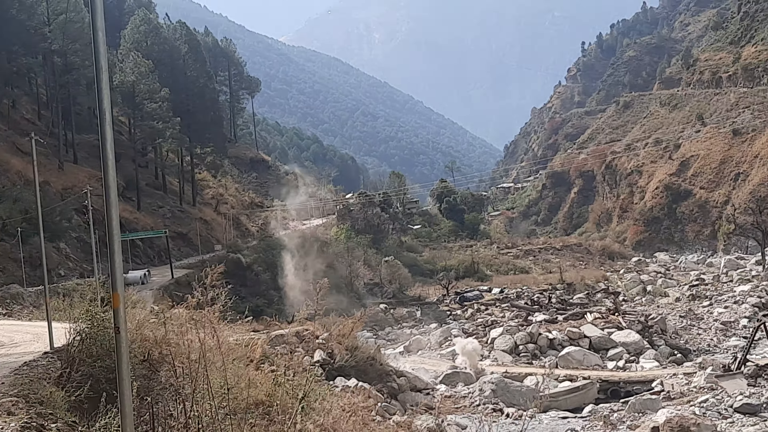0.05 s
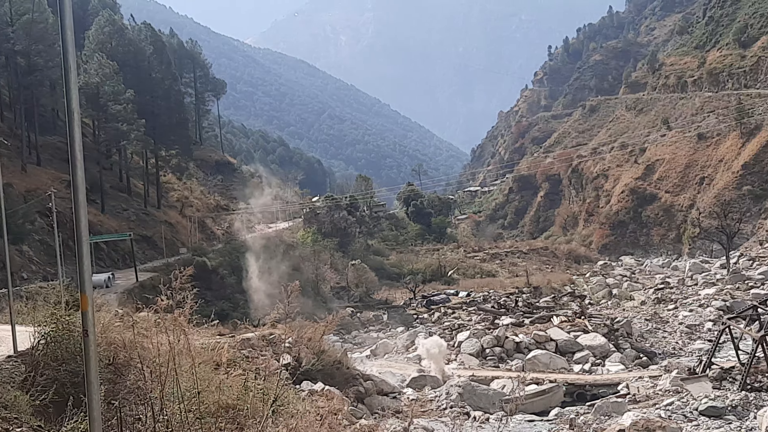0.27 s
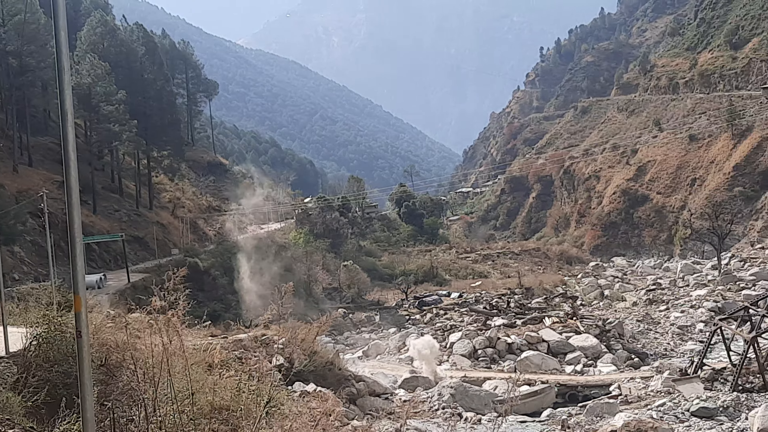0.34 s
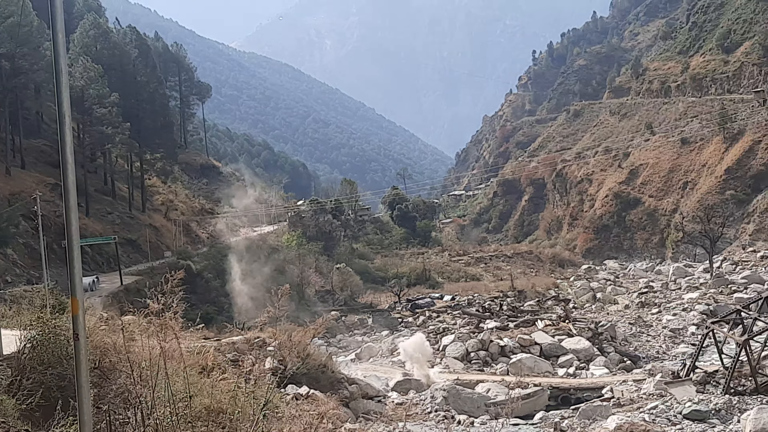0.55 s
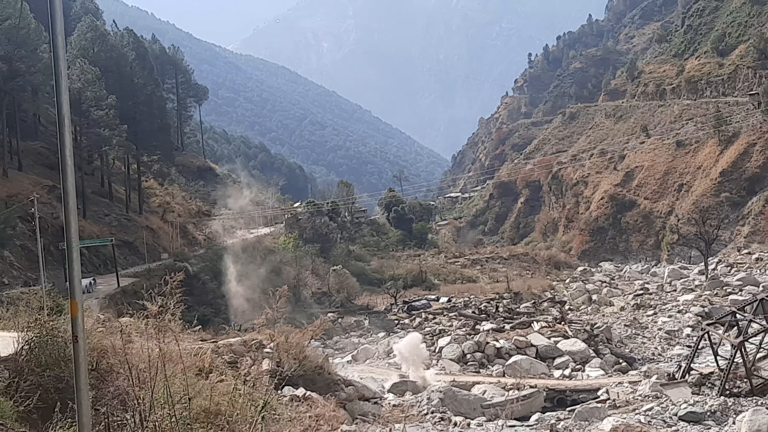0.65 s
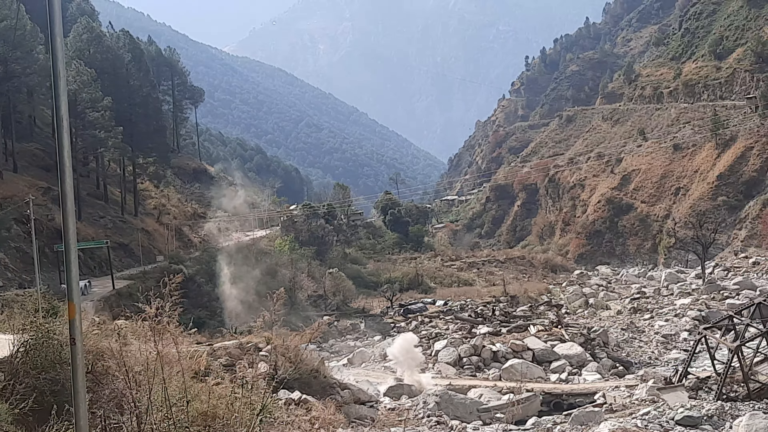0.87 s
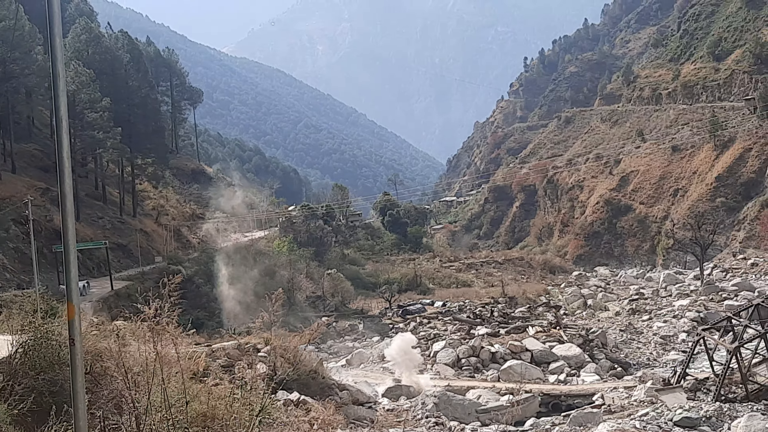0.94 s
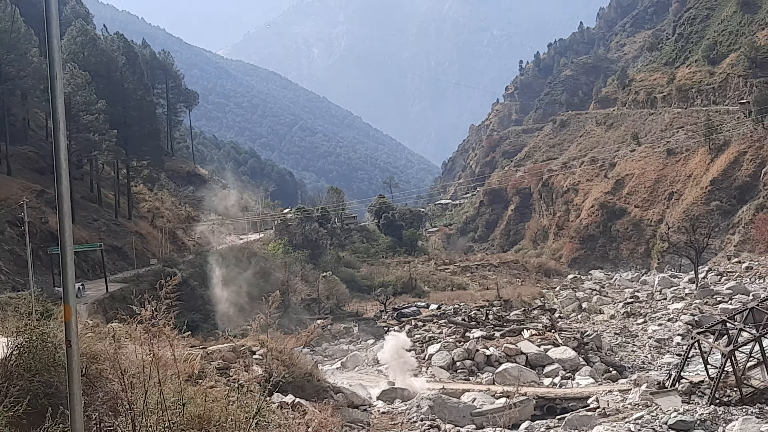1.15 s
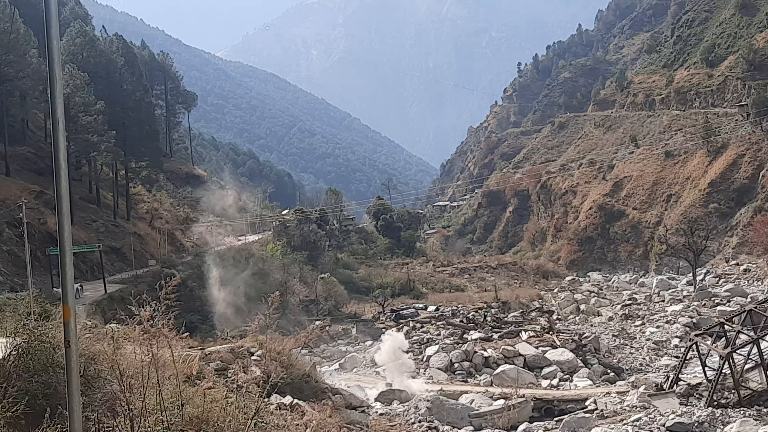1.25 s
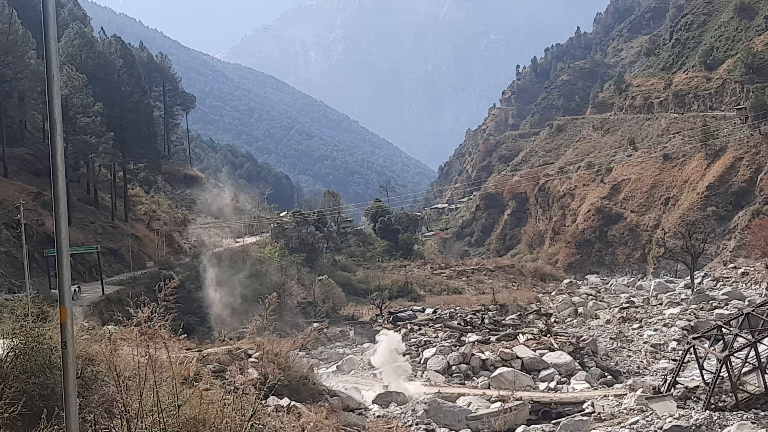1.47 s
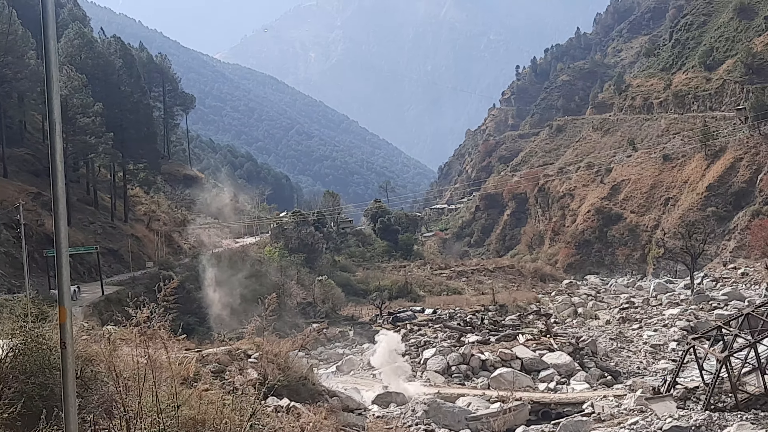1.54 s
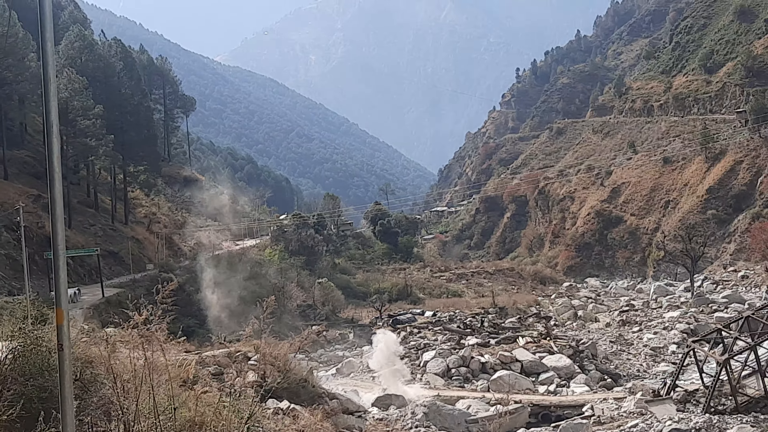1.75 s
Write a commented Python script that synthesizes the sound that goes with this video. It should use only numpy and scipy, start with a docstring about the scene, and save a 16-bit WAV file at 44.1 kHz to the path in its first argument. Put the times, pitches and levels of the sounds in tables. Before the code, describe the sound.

One explosion cracks in a riverbed, its echo rolling away between mountain slopes.

```python
"""A river rushes for a moment, then a sharp crack and a long rumble: a charge is blasting rock in its bed.
The shock wave makes the crack, scatters off stones and boulders and sets the ground booming.
Rock faces send it back as single echoes, and the slopes of the mountain valley as a rolling rumble.
The blast makes an automatic gain control turn everything down, so the river sinks and slowly comes back."""
import sys
import numpy as np
from scipy import signal
from scipy.fft import rfft, irfft
from scipy.io import wavfile
from scipy.ndimage import uniform_filter1d, minimum_filter1d

SR = 44100
rng = np.random.default_rng(int(sys.argv[2]) if len(sys.argv) > 2 else 0)


def master_out(mix):
    """Clip the mix to full scale and print it as 16-bit PCM to the path in sys.argv[1]."""
    frames = np.transpose(np.atleast_2d(mix))
    ceiling = np.clip(frames, -1, 1)
    pcm = np.round(ceiling * 32767).astype(np.int16)
    wavfile.write(sys.argv[1], SR, pcm)


N = 79380

BLAST_S, BLAST_DB = .2077, 19.5  # when it goes off; a boost for every source but the river

# Crackle off the nearest stones. Each row: frequency in Hz, relative level in dB.
STONE_SPECTRUM = [(100, -84.5), (1200, -59), (2200, -54), (3200, -61), (6000, -60.5), (9000, -66.5),
                  (15000, -71.5)]
# Low tones of the river bed. Each row: pitch in Hz, relative level in dB, fade time in seconds.
GROUND_TONES = [(70, -12.5, .045), (153, -11.5, 0.029), (283.8, -18, 0.043), (416, -24, .04),
                (486, -20, 0.04)]
# Echoes off single rock faces. Each row: start in seconds, relative level in dB, length of the push
# in milliseconds, rise time in milliseconds, left minus right in dB.
ROCK_ECHOES = [(0.2097, -1.5, 0.64, .06, 2), (.2115, -1.5, 1.1, 0.1, 4), (0.213, -3.5, .8, 0.27, 1.5),
               (.2140, 0, 1.7, 0.23, 0), (0.2249, -6, 8, .74, 3.5), (0.2368, -12, 0.38, 0.12, -12.5),
               (0.2362, -4.5, 0.6, 0.1, 4.5), (0.238, -7, 1.3, .2, -1), (0.3104, -13, 0.74, 0.26, -8),
               (.3432, -6, 1.3, .15, 5), (0.3469, -10, 0.49, 0.05, -1), (0.4084, -16, 0.18, .07, -5.5),
               (0.4306, -16.5, 3, 0.43, -1), (0.5982, -3.5, 0.88, 0.25, 1), (0.6258, 0, 0.69, 0.32, -1),
               (0.6609, -10, 0.9, 0.29, 3.5)]
# Scatter off the boulders. Each row: frequency in Hz, relative level in dB.
BOULDER_SPECTRUM = [(25, -71), (60, -36), (150, -45), (230, -49.5), (480, -41.5), (800, -47.5), (1150, -50),
                    (2100, -59.5), (3000, -66.5), (6000, -72.5), (15000, -91.5)]
# The valley's rumble. Each row: frequency in Hz, relative starting level in dB, fade in dB per second.
RUMBLE_SPECTRUM = [(25, -89.5, 4), (39.7, -64, 15), (66, -48.5, 14), (100, -45.5, 12.5), (147, -42, 9.5),
                   (182.4, -43.5, 10), (226, -51.5, 11.5), (298, -48.5, 13), (419, -52, 10.5),
                   (1002, -58.5, 14.5), (2150, -64, 16), (3320, -71, 21.5), (6440, -81.5, 26.5),
                   (14900, -106, 42)]
# Brief swells and lulls in the rolling rumble. Each row: time in seconds, gain in dB,
# half width in seconds, centre frequency in Hz, half width in octaves.
RUMBLE_SWELLS = [(.238, 7, .004, 6000, 1.2), (.314, 4, .007, 190, 1), (0.351, 4, 0.02, 127.6, 1.4),
                 (.42, 3.5, 0.04, 180, 1.2), (.41, 6, 0.0028, 4700, 1.3), (.346, 1.5, 0.0052, 2700, 4.3),
                 (.349, 6, 0.0044, 790, 0.7), (0.575, -3, 0.018, 200, 2.2), (.599, 3.5, .0025, 810, 1),
                 (.628, 4.5, .0025, 800, 1.2), (0.635, 3.2, 0.031, 550, 2.2), (0.86, 3, 0.29, 870, 4.5),
                 (0.864, 2, 0.036, 200, 0.72), (.965, 3.5, .025, 110, .8), (1.03, 2, .09, 2200, 1.1),
                 (1.5, -3, 0.019, 150, 3.4), (1.4, 5.5, 0.017, 390, 0.88), (1.59, 6, 0.018, 150, 1.3),
                 (1.66, 4, .05, 380, .7), (1.765, 9, 0.043, 78, 0.5)]
# Which side the scatter and rumble lean to. Each row: frequency in Hz, left minus right in dB.
ECHO_BALANCE = [(100, -0.5), (700, 1.5), (2000, -.5), (4400, -3.5), (8000, -8), (15000, 0)]
# The rush of the water. Each row: frequency in Hz, relative level in dB.
RIVER_SPECTRUM = [(25, -90.5), (45, -69), (100, -56.5), (210, -65), (295, -55), (420, -62), (750, -66.5),
                  (1500, -67.5), (3000, -79), (6000, -79), (15000, -97)]
# The microphone's tone. Each row: frequency in Hz, gain in dB.
MIC_RESPONSE = [(20, -36), (42, -17.5), (60, 0), (100, -2.5), (6800, -2.5), (8300, -6), (9300, -18.5),
                (10500, -16.5), (12000, -13.5), (15000, -10.5)]


def shock_wave(t):
    """Air pressure jumps up, falls into suction and jumps back; the front clicks in the microphone."""
    rise_s, length_s, suction = .000025, .00185, .62  # suction is a share of the push
    age = np.maximum(t - BLAST_S, 0)
    edge = lambda s: 1 - np.exp(-np.maximum(s, 0) / rise_s)
    pressure = (1 + suction) * bell(age, 0, width=.0005) - suction
    wave = pressure * (edge(age) - edge(age - length_s))
    click = pan(db=-10) * bell(t, BLAST_S + .00014, width=.000012)
    return amp(4) * wave - amp(6) * click


def stone_crackle(t):
    """Nearby stones splinter the shock front into a short, bright crackle."""
    hz, age = np.fft.rfftfreq(N, 1 / SR), np.maximum(t - BLAST_S, 0)
    scatter = stereo_noise(lag_s=0, alike_hz=3000, grain_db=2.5) * amp(at_hz(hz, STONE_SPECTRUM))
    return irfft(scatter, N) * pan(db=-3) * (age > 0) * np.exp(-age / .004)


def ground_boom(t):
    """The ground and the hollows between boulders ring low and briefly once the shock has passed."""
    age = np.maximum(t - BLAST_S - .003, 0)
    return sum(amp(db) * np.sin(2 * np.pi * hz * age) * np.exp(-age / fade_s)
               for hz, db, fade_s in GROUND_TONES)


def rock_echoes(t):
    """The nearest cliff returns one round thump; each rock face returns a push, then suction."""
    cliff_s, width_s = .3491, .0016
    offset = (t - cliff_s) / width_s
    out = amp(-5.5) * (1 - offset ** 2) * bell(offset, 0, 1)
    for start, db, push_ms, rise_ms, pan_db in ROCK_ECHOES:
        ms = np.maximum(t - start, 0) * 1000
        rise = 1 - np.exp(-(ms / rise_ms) ** 2)
        pulse = (1 - ms / push_ms) * np.exp(-ms / push_ms)
        out = out + amp(db) * pan(pan_db) * rise * pulse
    return out


def boulder_scatter(t):
    """Many tiny echoes off the boulders blur into a clatter that dies quickly."""
    build_s, fade_db_per_s = .0027, 175
    hz, age = np.fft.rfftfreq(N, 1 / SR), np.maximum(t - BLAST_S, 0)
    scatter = stereo_noise(lag_s=.00005, alike_hz=1500, grain_db=2) * amp(at_hz(hz, BOULDER_SPECTRUM))
    scatter *= pan(at_hz(hz, ECHO_BALANCE))
    bank_db = 4 * bell(t, .2407, width=.008)  # a cluster of echoes off the near bank
    return irfft(scatter, N) * (1 - np.exp(-age / build_s)) * amp(bank_db - fade_db_per_s * age)


def valley_rumble(t):
    """The valley's echo: each octave fades at its own rate, swelling and dipping as it rolls."""
    hz, age = np.fft.rfftfreq(N, 1 / SR), np.maximum(t - BLAST_S, 0)
    scatter = stereo_noise(lag_s=.00023, alike_hz=1230, grain_db=1) * amp(at_hz(hz, RUMBLE_SPECTRUM))
    scatter *= pan(at_hz(hz, ECHO_BALANCE))
    octave, out = np.log2(np.maximum(hz, 1)), 0
    for band in np.arange(4, 15):  # octaves from 16 Hz to about 16 kHz
        level_db = -at_hz(2. ** band, RUMBLE_SPECTRUM, column=2) * age
        for when, db, width_s, centre_hz, octaves in RUMBLE_SWELLS:
            level_db += db * bell(band, np.log2(centre_hz), octaves) * bell(t, when, width_s)
        band_noise = irfft(scatter * np.maximum(1 - abs(octave - band), 0), N)
        out = out + band_noise * amp(level_db)
    return out * (1 - np.exp(-age / .023))  # the rumble takes a moment to build


def river_rush():
    """Distant white water rushes steadily, a little to the right."""
    hz = np.fft.rfftfreq(N, 1 / SR)
    rush = stereo_noise(lag_s=.000328, alike_hz=1890, grain_db=.5) * amp(at_hz(hz, RIVER_SPECTRUM))
    return irfft(rush, N) * pan(db=-2)


def stereo_noise(lag_s, alike_hz, grain_db):
    """Left and right spectra of grainy noise: alike in the bass, with the left late by lag_s."""
    hz = np.fft.rfftfreq(N, 1 / SR)
    grains = amp(grain_db * np.repeat(rng.standard_normal(N // 64 + 1), 64)[:N])
    shared, separate = rfft(rng.standard_normal((2, N)) * grains / np.sqrt(np.mean(grains ** 2)))
    alike = 1 / (1 + (hz / alike_hz) ** 2)
    left = shared * np.exp(-2j * np.pi * hz * lag_s)
    right = alike * shared + np.sqrt(1 - alike ** 2) * separate
    return np.sqrt(SR / 2) * np.array([left, right])


def amp(db):
    """Turn decibels into a gain."""
    return 10 ** (np.asarray(db) / 20)


def at_hz(hz, table, column=1):
    """Read between a table's rows, on a log-frequency scale."""
    rows = np.array(table, float)
    return np.interp(np.log(np.maximum(hz, 1)), np.log(rows[:, 0]), rows[:, column])


def bell(x, centre, width):
    """A smooth bump of height 1."""
    return np.exp(-.5 * ((x - centre) / width) ** 2)


def pan(db):
    """Left and right gains; positive dB leans left."""
    return amp(np.vstack([db, -db]) / 2)


def microphone(x):
    """The microphone weakens the deepest bass and the high treble."""
    size = 2 * N
    gain = amp(at_hz(np.fft.rfftfreq(size, 1 / SR), MIC_RESPONSE))
    cepstrum = irfft(np.log(gain))
    cepstrum[1:N] *= 2  # folded so the filter rings only after a sound, never before
    cepstrum[N + 1:] = 0
    return irfft(rfft(x, size) * np.exp(rfft(cepstrum)))[:, :N]


def scene():
    """The blast and its echoes over the river."""
    t = np.arange(N) / SR
    blast = shock_wave(t) + stone_crackle(t) + ground_boom(t)
    echoes = rock_echoes(t) + boulder_scatter(t) + valley_rumble(t)
    return amp(BLAST_DB) * (blast + echoes) + river_rush()


def record(dry):
    """After the microphone, the gain drops at once on a loud peak, holds, then creeps back."""
    ceiling_db, hold_s, release_db_per_s, top_hz = 2.2, .9, 12.5, 16600
    t = np.arange(N) / SR
    x = microphone(dry)
    peak_db = 20 * np.log10(abs(x).max(axis=0) + 1e-9)
    over_db = np.maximum(peak_db - ceiling_db, 0)
    ahead_db = -minimum_filter1d(-over_db, size=33)  # react just before the peak
    half_hold = int(hold_s * SR / 2)
    held_db = -minimum_filter1d(-ahead_db, 2 * half_hold + 1, origin=half_hold, mode="constant")
    cut_db = np.maximum.accumulate(held_db + release_db_per_s * t) - release_db_per_s * t
    x = x * amp(-uniform_filter1d(cut_db, size=17))
    x = x / (1 + x ** 6) ** (1 / 6)  # round off the peaks
    low_pass = signal.ellip(8, .2, 70, top_hz, fs=SR, output="sos")
    return signal.sosfilt(low_pass, x)


dry = scene()
out = record(dry)
master_out(out)
```